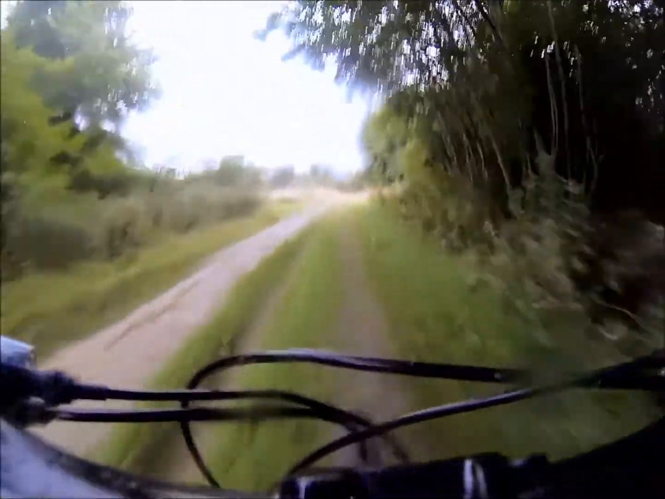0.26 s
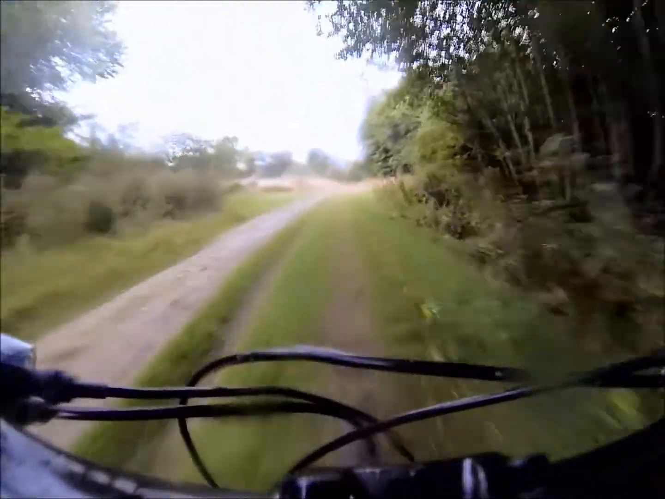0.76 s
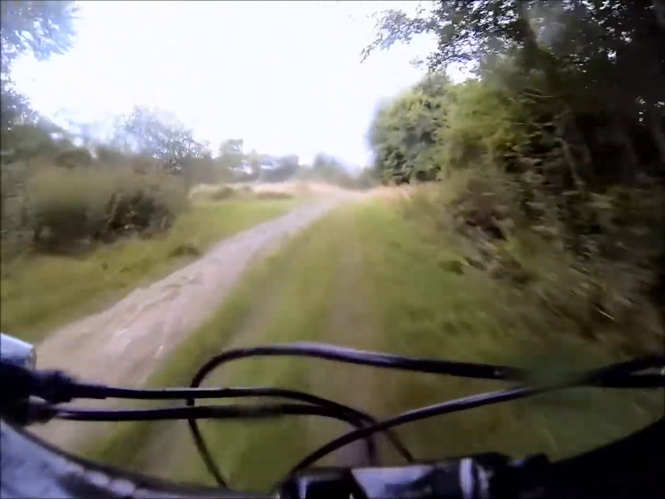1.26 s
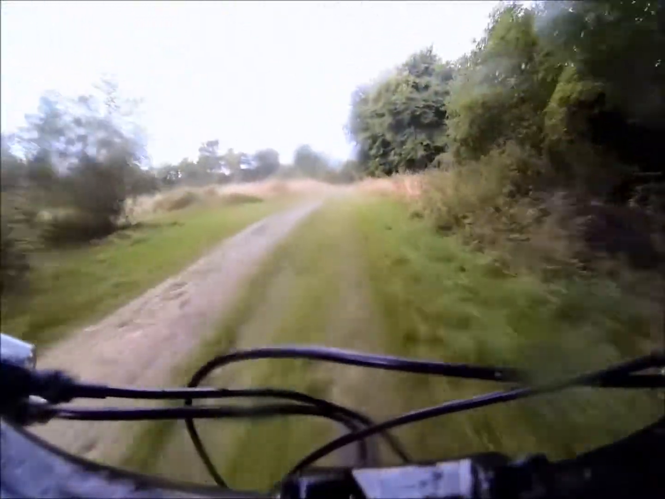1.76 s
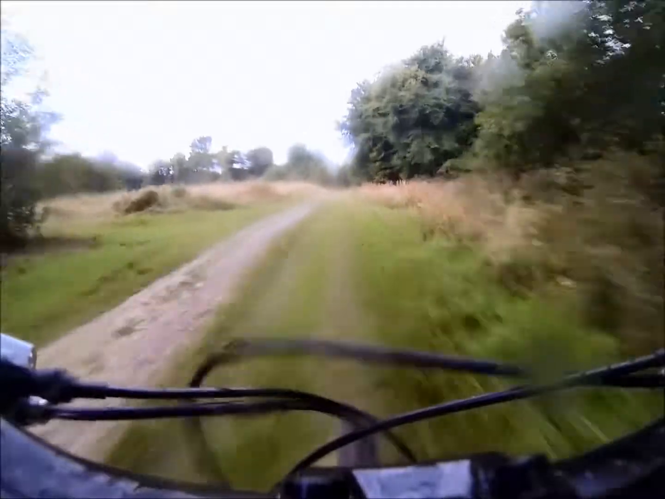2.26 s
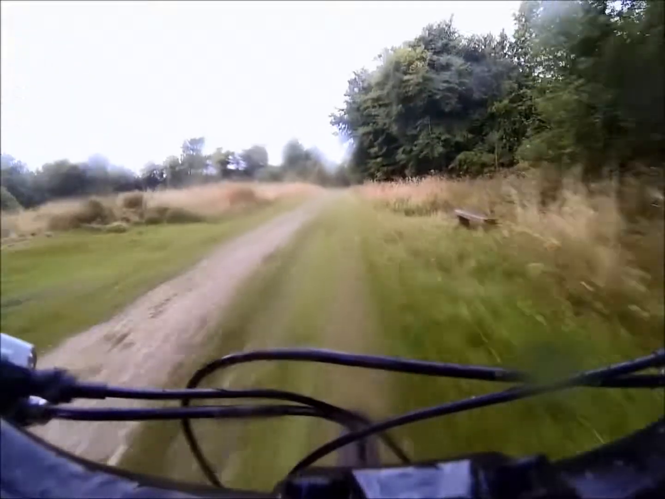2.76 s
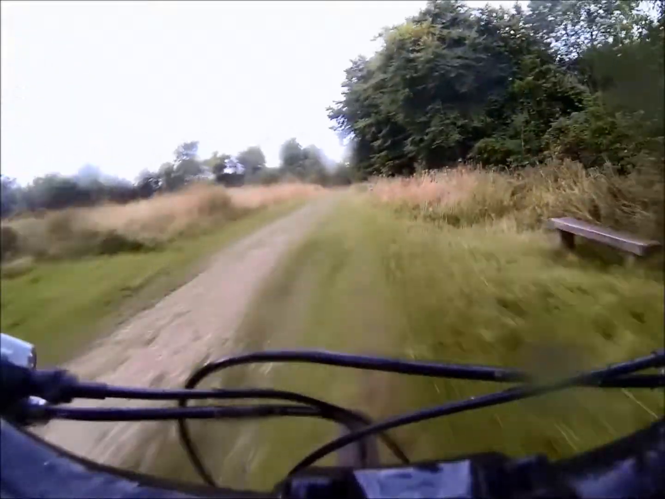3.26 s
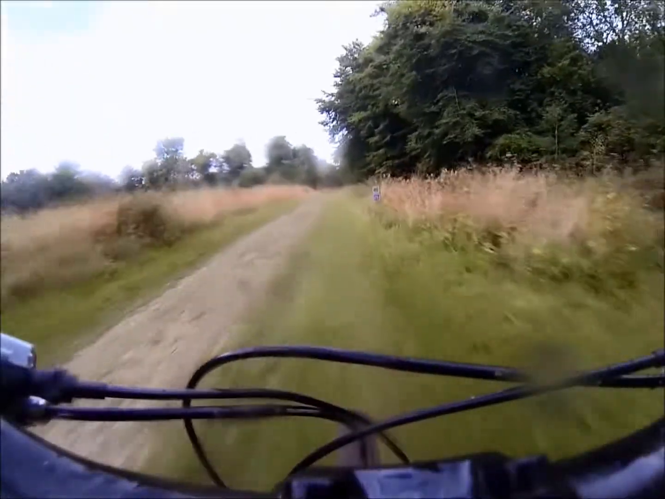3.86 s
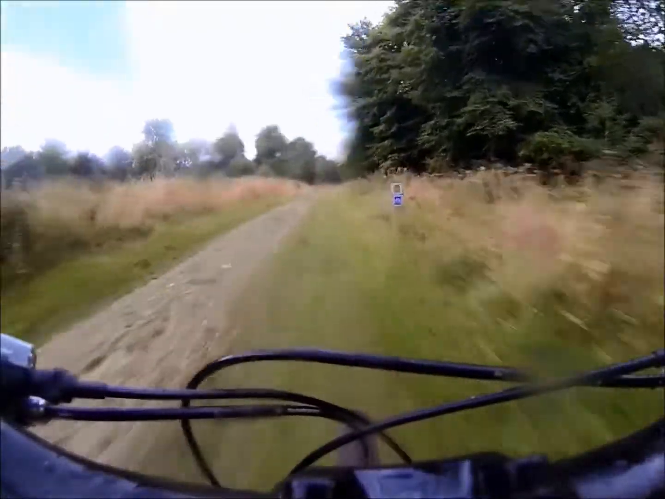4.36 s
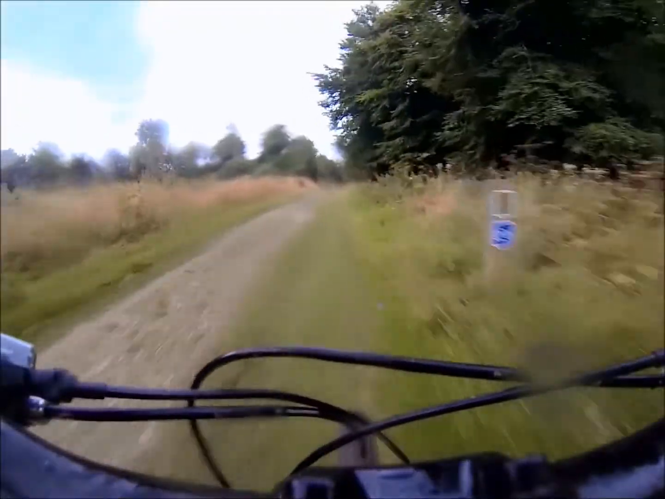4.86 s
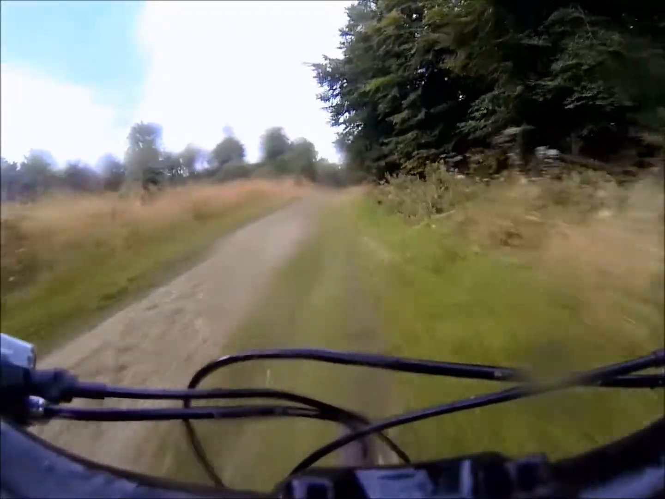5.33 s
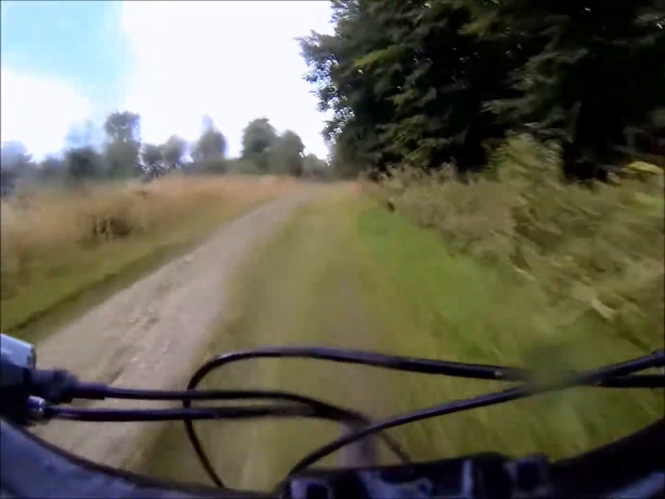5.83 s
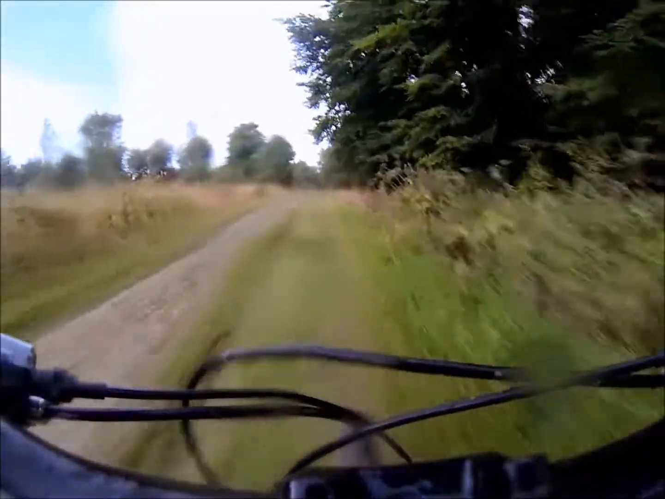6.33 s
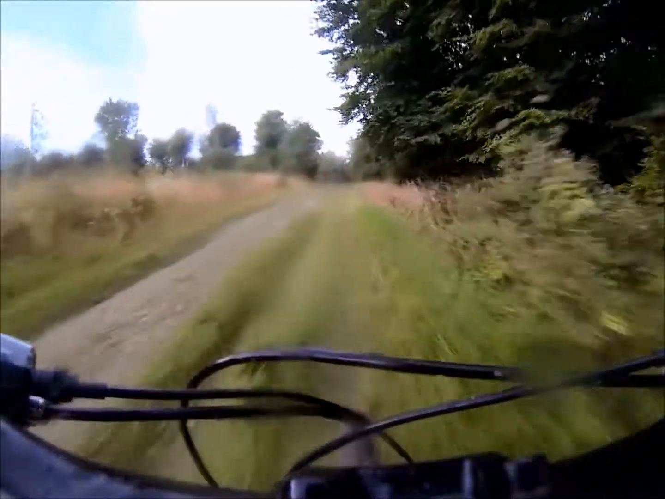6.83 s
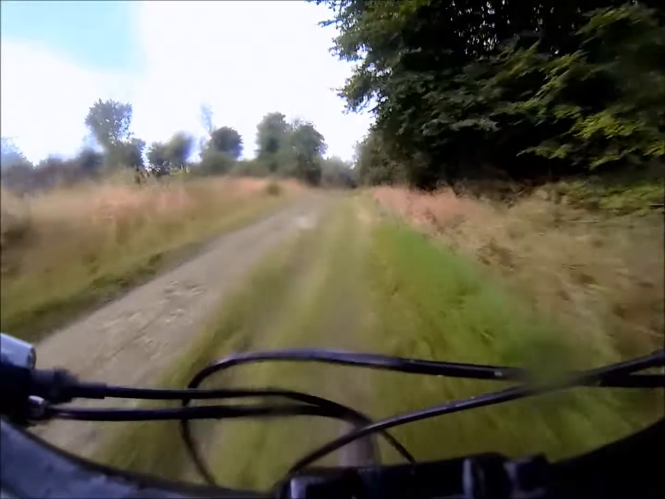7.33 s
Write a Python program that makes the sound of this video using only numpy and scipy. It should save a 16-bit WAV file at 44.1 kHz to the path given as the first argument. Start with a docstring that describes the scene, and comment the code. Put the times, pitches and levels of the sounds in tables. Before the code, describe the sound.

Loud, deep, wavering tyre hum and wind rumble from a speeding bicycle on bumpy grass, with soft crunching, bump knocks and small rattles.

```python
"""On a grassy track, a mountain bike rolls fast, heard from a camera on its handlebar.
The tyre knobs drum a deep wavering hum, made of sine waves, over a noise rumble of wind and uneven ground.
Crunching grit, thudding tufts and rustling grass are noise that grows louder on rough patches.
Bumps ring the camera housing, cables tick and loose parts clink; the hardest shakes crackle in short noise."""
import sys
import numpy as np
from scipy import signal
from scipy.fft import rfft, irfft
from scipy.io import wavfile

SR = 44100
rng = np.random.default_rng(int(sys.argv[2]) if len(sys.argv) > 2 else 0)


def inscribe(sig):
    """Save sig as 16-bit PCM at rate SR to the path in sys.argv[1].

    A 1-D sig is mono; a 2-D sig holds one channel per row.
    Samples are clipped to [-1, 1] before scaling.
    """
    pcm = np.round(np.clip(np.atleast_2d(sig).T, -1, 1) * 32767)
    wavfile.write(sys.argv[1], SR, pcm.astype(np.int16))


N = 334719  # length in samples
TIME = np.arange(N) / SR  # seconds


def gain_of(db):
    """Turns decibels into amplitude."""
    return 10 ** (np.asarray(db) / 20)


def evened(x):
    """Scales a sound to an average strength (rms) of 1."""
    return x / np.sqrt(np.mean(x ** 2) + 1e-20)


def add(mix, s, sound):
    """Mixes a sound in, starting at s seconds."""
    part = mix[max(round(s * SR), 0):][:len(sound)]
    part += sound[:len(part)]


def lowpass(x, hz):
    """Gently removes the treble above hz."""
    return signal.sosfilt(signal.butter(2, hz, fs=SR, output="sos"), x)


def drift(hz):
    """Random wandering of rms 1, with its faster movements fading out around hz."""
    f = np.fft.rfftfreq(N, 1 / SR)
    slowed = rfft(rng.standard_normal(N)) * np.exp(-(f / hz) ** 2)
    return evened(irfft(slowed, N))


def swells(rows):
    """Adds up smooth arches over time, each given as (middle s, length s, height)."""
    out = np.zeros(N)
    for s, length, height in rows:
        arch = np.hanning(max(round(length * SR), 3))
        add(out, s - length / 2, height * arch)
    return out


def colour(x, spectrum, resonances=(), size=8192):
    """Filters a sound to a smooth spectrum lifted by resonances; the filter has unit energy."""
    f = np.fft.rfftfreq(size, 1 / SR)
    hz, db = np.transpose(spectrum)
    shape_db = np.interp(np.log(f + 1), np.log(hz), db)
    for centre, width, lift in resonances:
        shape_db = shape_db + lift / (1 + (2 * (f - centre) / width) ** 2)
    # the cepstrum turns the spectrum into a ring that starts at once and dies away
    cepstrum = irfft(np.log(gain_of(shape_db)))[:size // 2]
    ring = irfft(np.exp(rfft(2 * cepstrum, size)))[:size // 2]
    return signal.oaconvolve(x, ring / np.linalg.norm(ring))[:len(x)]


def burst(rise_s, fall_s, size=4096):
    """A puff of noise that swells and dies; its loudness curve peaks at 1."""
    t = np.arange(size) / SR
    shape = (1 - np.exp(-t / rise_s)) ** 2 * np.exp(-t / fall_s)
    return shape / shape.max() * rng.standard_normal(size)


def impacts(per_s, spread_db):
    """Random contacts of rms 1: many small, a few large."""
    sizes = gain_of(spread_db * np.minimum(rng.exponential(1, N), 3))
    signs = rng.choice([-1, 1], N)
    hits = rng.random(N) < per_s / SR
    return evened(sizes * signs * hits)


# The tyres cross rough patches: [middle t/s, length t/s, roughness level/dB above smooth grass]
ROUGH_PATCHES = [(0.19, 0.2, 6.5), (0.40, 0.24, 9.5), (0.62, .18, 8), (0.79, 0.26, 10.5), (1.26, .14, 7.5),
                 (1.40, 0.11, 7.5), (1.52, 0.19, 10), (1.76, 0.21, 7), (2.05, 0.32, 9.5), (2.31, 0.37, 7.5),
                 (2.58, 0.099, 12), (2.83, .22, 6.5), (3.11, 0.59, 9.5), (3.36, 0.14, 7), (3.71, 0.37, 10),
                 (4.10, 0.49, 6), (4.42, 0.75, 4), (4.68, 0.15, 9.5), (5.05, 0.13, 9.5), (5.25, .2, 7),
                 (5.62, 0.52, 10.5), (6.17, 0.41, 7.5), (6.39, 0.23, 10.5), (6.6, .1, 10), (6.77, .1, 10),
                 (7.19, 0.23, 10), (7.43, 0.27, 8.5)]


def roughness(uneven_db=1.0, shake_db=1.5):
    """Roughness in dB above smooth grass; patches raise it, hard shakes grind the tyre in."""
    shake_lift_db = swells((s, SHAKE_S, shake_db) for s, _ in HARD_SHAKES)
    return swells(ROUGH_PATCHES) + shake_lift_db + uneven_db * drift(10)


# Tone of wind and uneven ground: [f/Hz, relative level/dB]
RUMBLE_TONE = [(8, -6), (16, 0), (25, 0.5), (40, -1), (60, -8.5), (80, -7.5), (100, -13.5), (140, -34),
               (220, -45), (500, -90)]


def rumble(lift_db, smooth_db=-24, follow=0.96, gust_db=3.0):
    """Wind and the uneven track shake the camera: deep noise, stronger on rough ground."""
    # follow is the dB gained per dB of roughness
    level_db = smooth_db + follow * lift_db + gust_db * drift(26)
    return gain_of(level_db) * evened(colour(rng.standard_normal(N), RUMBLE_TONE))


# Resonances and hollows of the camera housing and handlebar: [f/Hz, width f/Hz, lift level/dB]
HOUSING_MODES = [(394.6, 63, 10), (492.7, 53, 10), (526.2, 83, 11), (1130, 32, -3), (1473, 130, 8),
                 (1556, 82, 6.5), (1790, 230, -1), (3320, 72, 3.5), (3760, 270, 2), (4700, 180, 3.5),
                 (9270, 220, 12)]
# Tone of grass on the tread: [f/Hz, relative level/dB]
SWISH_TONE = [(300, -10.5), (900, -1.5), (1450, 4.5), (1900, -5.5), (2400, -14.5), (3100, -6.5),
              (3900, -10.5), (4700, -21.5), (7000, -25.5), (10000, -32.5), (15000, -47)]


def swish(rough_db, level_db=-52, follow=0.6, waver_db=3.5):
    """Grass brushes the tread: a smooth rustle that sings in the upper resonances."""
    swell_db = level_db + follow * (rough_db - rough_db.mean()) + waver_db * drift(46)
    return colour(rng.standard_normal(N) * gain_of(swell_db), SWISH_TONE, HOUSING_MODES)


# Tone of a clod under the tyre: [f/Hz, relative level/dB]
THUD_TONE = [(30, -16), (70, -5.5), (110, 6), (170, -2), (260, -19), (500, -34.5), (1500, -71)]


def tufts(rough_db, level_db=8, thuds_per_s=35, spread_db=3):
    """Tufts and clods thud dully through the tyres, harder where the ground is rough."""
    return colour(impacts(thuds_per_s, spread_db) * gain_of(rough_db + level_db), THUD_TONE)


# Tone of crushed soil and grit: [f/Hz, relative level/dB]
GROUND_TONE = [(40, -12), (100, 5), (160, 0), (240, 3.5), (340, -6), (450, -15), (620, -15.5), (900, -19),
               (1350, -27), (1900, -27.5), (3700, -38.5), (4800, -45), (9000, -63), (15000, -74.5)]


def ground(rough_db, level_db=4.0, grains_per_s=900, spread_db=5.5, hiss_share=0.4, flutter_db=2):
    """Soil and grit crushed under the tyres; the grains travel up the frame into the housing."""
    grains = impacts(grains_per_s, spread_db) + hiss_share * rng.standard_normal(N)
    fluttering = evened(grains * gain_of(flutter_db * drift(68)))
    return colour(fluttering * gain_of(rough_db + level_db), GROUND_TONE, HOUSING_MODES)


# Tone of a blow to the wheels: [f/Hz, relative level/dB]
BLOW_TONE = [(30, -15.5), (90, 13), (200, 5), (300, -4), (520, -10.5), (800, -7), (1400, -0.5),
             (2000, -14.5), (3000, -27), (6000, -41.5), (15000, -60.5)]
# The wheels hit bumps: [t/s, relative level/dB, hardness as treble level/dB]
WHEEL_BUMPS = [(0.2, -31, 1), (0.349, -13, -6), (0.392, -24, 6.5), (0.858, -25, -9), (1.05, -23.5, -18),
               (1.265, -18.5, -11.5), (1.78, -30, -3), (1.89, -16, -9), (2.002, -21, -2),
               (2.111, -11.5, -0.5), (2.322, -15, -8.5), (2.352, -22.5, 1.5), (2.431, -20, 0),
               (2.741, -22, -7.5), (3.116, -12.5, -7), (3.209, -20.5, -17), (4.58, -23.5, -15),
               (4.758, -9, -9.5), (5.064, -16, -7.5), (5.219, -20.5, -3.5), (5.472, -20, -3),
               (5.517, -18, -1), (5.656, -14, -5.5), (5.703, -27, 6.5), (5.806, -18.5, -5.5),
               (6.095, -9.5, -4), (6.334, -15.5, -9.5), (6.394, -15, 0), (6.415, -13.5, -28),
               (6.458, -16, -6.5), (6.575, -22, -9.5), (7.138, -34, 5.5), (7.444, -29.5, 1.5)]


def bumps(level_db=-2, push_db=24, push_s=0.00036, scatter_db=-9, scatter_s=0.0062, soft_hz=700):
    """Each bump is one rounded push and a light scatter of grit; hard ones keep their treble."""
    force, t = np.zeros(N), np.arange(4096) / SR
    push = np.exp(-((t - .003) / push_s) ** 2)
    push = gain_of(push_db) * push / push.sum()
    thin = signal.butter(2, soft_hz, "highpass", fs=SR, output="sos")
    for s, db, hard_db in WHEEL_BUMPS:
        grit = signal.sosfilt(thin, burst(0.00081, scatter_s))  # too light to shake the low resonances
        blow = push + gain_of(scatter_db) * grit
        dull = lowpass(blow, soft_hz)
        treble = gain_of(hard_db) * (blow - dull)
        add(force, s, gain_of(db + level_db) * (dull + treble))
    return colour(force, BLOW_TONE, HOUSING_MODES)


# Ways a cable rings: [f/Hz, level/dB, time to fall 60 dB t/s]
CABLE_MODES = [(3330, -3.5, 0.016), (3780, -7, 0.025), (4000, -3.5, 0.016), (4720, -13.5, 0.018),
               (6200, -22.5, 0.012), (9150, -31.5, 0.0087)]
# Cables tap each other: [t/s, level/dB]
CABLE_TICKS = [(0.053, -42), (0.402, -35.5), (0.621, -35.5), (0.8852, -40), (0.9708, -37), (1.8108, -39),
               (2.239, -36.5), (2.5008, -37), (3.7224, -37), (5.228, -28.5), (5.2405, -34), (5.2697, -34.5),
               (5.7128, -36), (5.8651, -34.5), (6.1532, -29.5), (6.5796, -32), (6.59, -39)]


def cables(bounce_db=-9, longest_bounce_s=0.0041, detune=0.015):
    """A cable taps its neighbour and bounces once, ringing a little differently each time."""
    out, t = np.zeros(N), np.arange(2048) / SR
    onset = 1 - np.exp(-t / 0.00023)
    for s, db in CABLE_TICKS:
        bounce_s = longest_bounce_s * rng.uniform(.5, 1)
        for delay, drop_db in [(0, 0), (bounce_s, bounce_db)]:
            ring = np.zeros(len(t))
            for k, (hz, mode_db, t60) in enumerate(CABLE_MODES):
                fade = gain_of(mode_db - 60 * t / t60)
                swing = np.sin(2 * np.pi * hz * rng.normal(1, detune) * t)
                # neighbouring modes swing in opposite senses, so the tick is a narrow chirrup
                ring += (-1) ** k * fade * swing
            add(out, s + delay, gain_of(db + drop_db) * ring * onset)
    return out


# Tone of metal snapping on the bar: [f/Hz, relative level/dB]
SNAP_TONE = [(500, -33.5), (1700, 10), (4000, 7), (7500, -5.5), (9000, -14), (12000, -11), (15000, -10)]
# Loose parts clink: [t/s, level/dB, pitch f/Hz, time to fall 60 dB t/s, snap level/dB beside the ring]
PART_CLINKS = [(2.555, -29, 1620, 0.032, -38), (4.381, -37.5, 1326, 0.09, -3),
               (4.941, -30.5, 1730, 0.047, -10.5), (5.039, -26, 1505, 0.047, -3)]


def clinks(snap_s=0.0016, upper_ratio=3.78, upper_db=-18):
    """Loose metal parts snap against the bar and ring in two modes, the upper dying twice as fast."""
    out = np.zeros(N)
    for s, db, hz, t60, snap_db in PART_CLINKS:
        snap = colour(burst(0.00078, snap_s), SNAP_TONE)
        t = np.arange(len(snap)) / SR
        fade = gain_of(-60 * t / t60)
        angle = 2 * np.pi * hz * t
        upper = gain_of(upper_db) * fade ** 2 * np.sin(upper_ratio * angle)
        ring = fade * np.sin(angle) + upper
        add(out, s, gain_of(db) * (ring + gain_of(snap_db) * snap))
    return out


# Tone of the crackle: [f/Hz, relative level/dB]
CRACKLE_TONE = [(300, -17), (1200, 5.5), (2400, 7), (4000, -2), (7000, -11.5), (10000, -18), (15000, -37.5)]
# The hardest shakes, which make the microphone crackle: [t/s, relative crackle level/dB]
HARD_SHAKES = [(0.181, -56), (0.36, -39), (0.377, -37), (0.4203, -39.5), (0.6161, -38), (0.776, -42),
               (0.8594, -42), (1.257, -42), (1.277, -45), (1.4064, -41), (1.43, -42), (1.8427, -42.5),
               (1.9017, -40.5), (2.142, -38.5), (2.3274, -48), (2.438, -41), (2.5954, -40.5), (2.857, -40),
               (3.2238, -38), (3.378, -41), (3.721, -37), (3.7652, -39), (4.0673, -43), (4.223, -44),
               (4.5577, -37.5), (4.6917, -40.5), (4.764, -38.5), (5.0744, -40), (5.292, -43.5),
               (5.3398, -46.5), (5.6735, -40.5), (5.8558, -39), (6.107, -40.5), (6.425, -41), (6.4667, -40),
               (6.789, -42.5), (6.9939, -49), (7.2411, -40.5), (7.4587, -38.5)]
SHAKE_S = 0.034  # length of the swell around each shake, seconds


def crackles(level_db=-1, length_s=0.0058):
    """A few milliseconds of dry fizz around the top of each hard shake."""
    out = np.zeros(N)
    window = signal.windows.tukey(round(length_s * SR), .7)
    for s, db in HARD_SHAKES:
        add(out, s, gain_of(db + level_db) * window * rng.standard_normal(len(window)))
    return colour(out, CRACKLE_TONE)


# How fast the tread blocks meet the ground: [t/s, f/Hz]
TREAD_RATE = [(0.0, 61.2), (0.43, 60.7), (0.58, 64.5), (0.81, 57.97), (1.0, 61.84), (1.18, 60.2),
              (1.37, 64.27), (1.55, 60.9), (1.98, 59.85), (2.13, 64.1), (2.52, 60.5), (3.15, 63.43),
              (3.33, 59.26), (3.7, 65.9), (3.87, 62), (4.1, 63.28), (4.42, 59.4), (4.8, 61.34),
              (5.05, 59.28), (5.23, 62.7), (5.42, 60.13), (5.58, 63), (5.9, 61.16), (6.3, 62.8),
              (6.95, 58.4), (7.38, 66.38), (7.5, 61.2)]
# The tyre goes light and its hum drops; a negative depth is a rise: [middle t/s, length t/s, depth level/dB]
TYRE_SKIPS = [(0.35, 0.45, 7), (0.58, 0.091, 30), (1.215, .11, 21), (1.335, 0.099, 6.5), (1.975, 0.081, 17),
              (2.065, 0.07, 8), (2.22, 0.11, 9.5), (2.53, 0.17, 7.5), (2.78, 0.11, 4.5), (2.955, 0.066, 16),
              (3.125, 0.036, -0.5), (3.28, 0.085, 11.5), (3.70, 0.31, 4), (4.59, 0.061, 15),
              (4.74, 0.11, 18.5), (4.98, 0.29, 7), (5.625, 0.095, 20), (5.715, 0.12, 7.5),
              (6.02, 0.082, 9.5), (6.135, .07, 16), (6.33, 0.097, 20), (6.52, 0.11, 11.5),
              (6.745, 0.093, 15), (6.9, 0.19, 6), (7.29, 0.052, 3.5), (7.42, 0.09, 14)]


def knobs(even_db=-12, waver_db=1.12, wobble_hz=0.4, shake_db=3.5, crest_s=0.003,
          second_db=-36, third_db=-42):
    """Tread blocks meet the ground in turn; the frame passes little but their lowest tone."""
    hz = np.interp(TIME, *np.transpose(TREAD_RATE)) + wobble_hz * drift(8.64)
    shake_swell_db = swells((s, SHAKE_S, shake_db) for s, _ in HARD_SHAKES)
    db = even_db - swells(TYRE_SKIPS) + shake_swell_db + waver_db * drift(25)
    angle = 2 * np.pi * np.cumsum(hz) / SR
    # shift the angle so that a swing peaks, up or down, crest_s after each crackle starts
    crests = np.transpose(HARD_SHAKES)[0] + crest_s
    ahead = np.unwrap(np.interp(crests, TIME, angle) % np.pi, period=np.pi)
    angle = angle - np.interp(TIME, crests, ahead)
    second = gain_of(second_db) * np.sin(2 * angle)
    third = gain_of(third_db) * np.sin(3 * angle)
    return gain_of(db) * evened(np.cos(angle) + second + third)


def scene(smooth_db=-48):
    """All that reaches the handlebar; roughness drives rumble, thuds, crunch and rustle."""
    lift_db = roughness()
    rough_db = smooth_db + lift_db  # each layer sets its own level from this
    rolling = rumble(lift_db) + swish(rough_db) + tufts(rough_db) + ground(rough_db) + knobs()
    return (rolling + bumps() + cables() + clinks() + crackles())[None]


# Tone of a tick of the microphone: [f/Hz, relative level/dB]
MIC_TICK_TONE = [(500, -11), (2000, 4), (5000, -4), (8000, -13), (11000, -20.5), (15000, -28.5)]


def record(dry, knee=0.67, headroom=0.13, fizz_from=0.41, fizz_range=0.093, fizz_db=-51,
           sparks_per_s=4000, spread_db=3, waver_db=2.5, edge_hz=15800):
    """The microphone rounds off the largest swings, fizzes on wide ones and cuts the top treble."""
    x = dry[0]
    over = np.maximum(abs(x) - knee, 0)
    x = x + np.sign(x) * (headroom * np.tanh(over / headroom) - over)
    strain = np.clip((abs(x) - fizz_from) / fizz_range, 0, 1)  # 0 on small swings, 1 on wide ones
    sparks = impacts(sparks_per_s, spread_db) * strain * gain_of(waver_db * drift(50))
    x = x + gain_of(fizz_db) * colour(sparks, MIC_TICK_TONE)
    treble_cut = signal.firwin(511, edge_hz, window=("kaiser", 9), fs=SR)
    return signal.oaconvolve(x, treble_cut, "same")[None]


dry = scene()
out = record(dry)
inscribe(out)
```